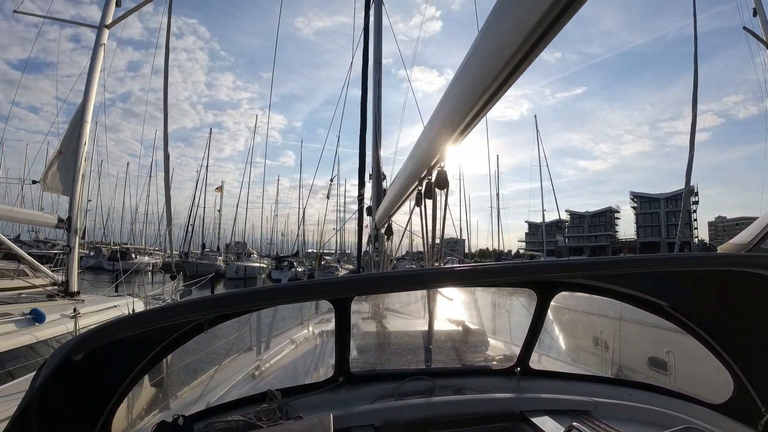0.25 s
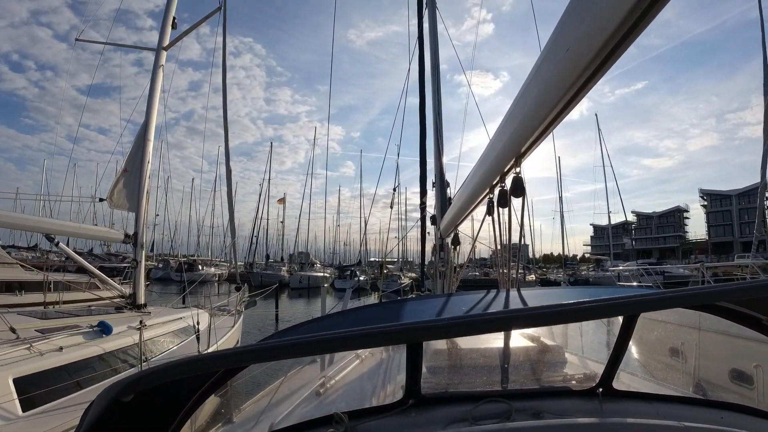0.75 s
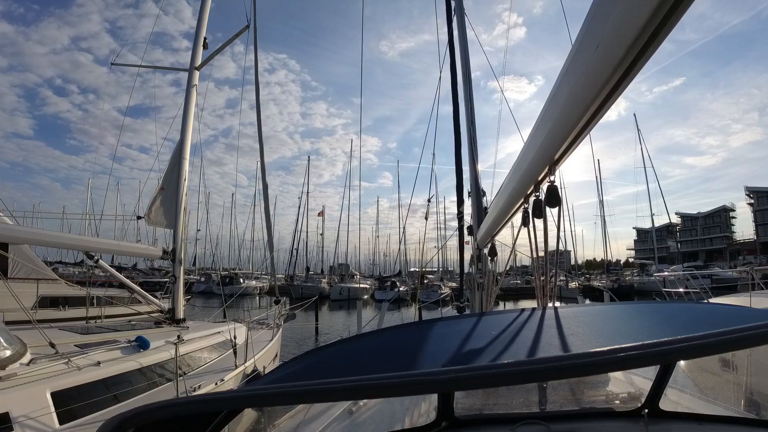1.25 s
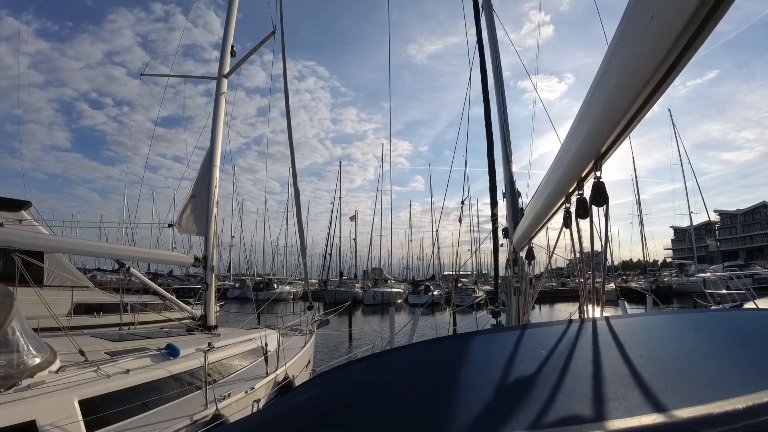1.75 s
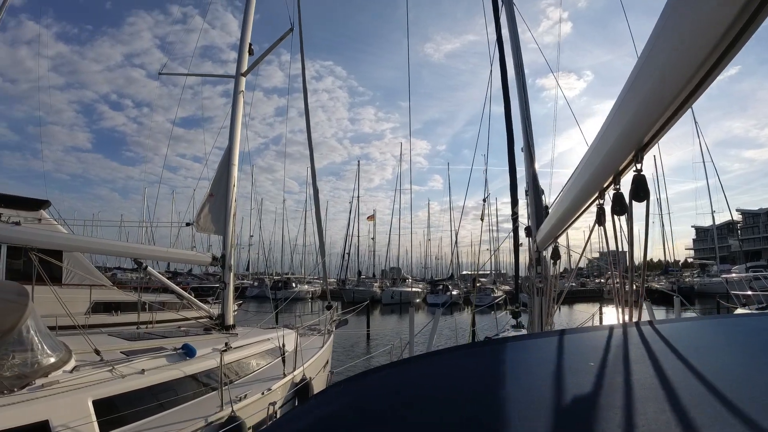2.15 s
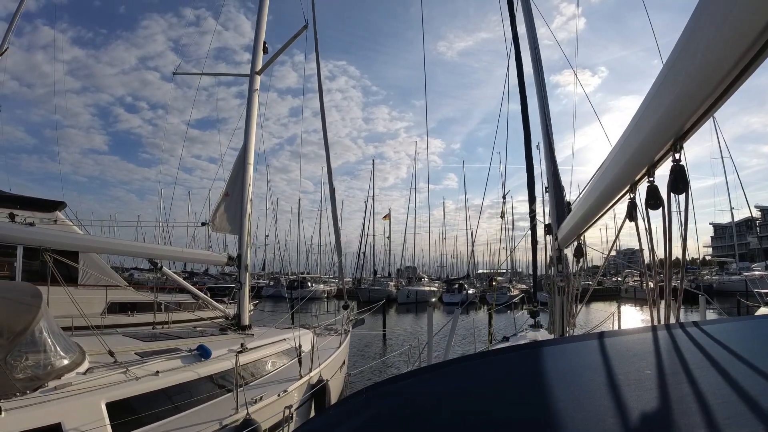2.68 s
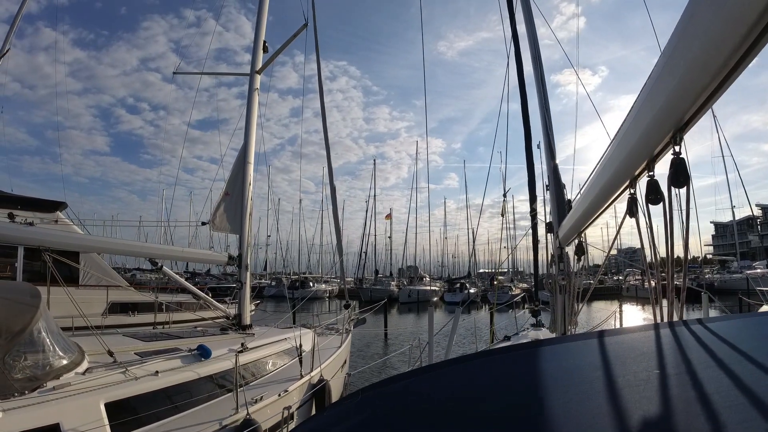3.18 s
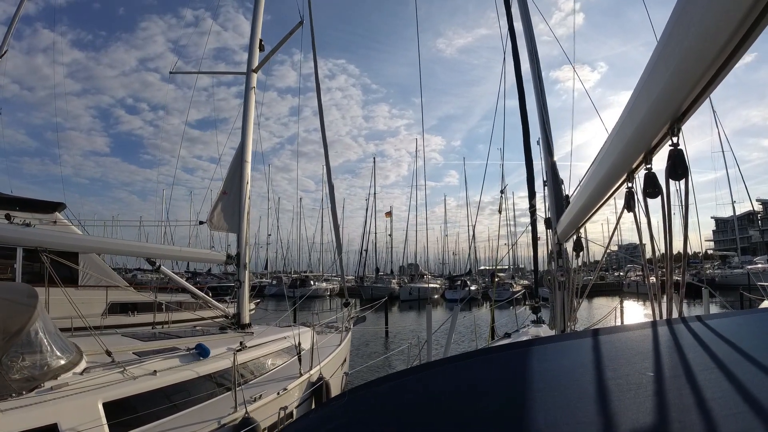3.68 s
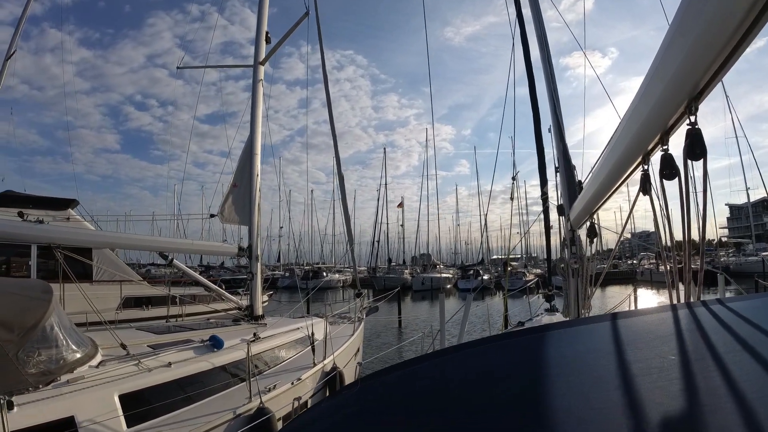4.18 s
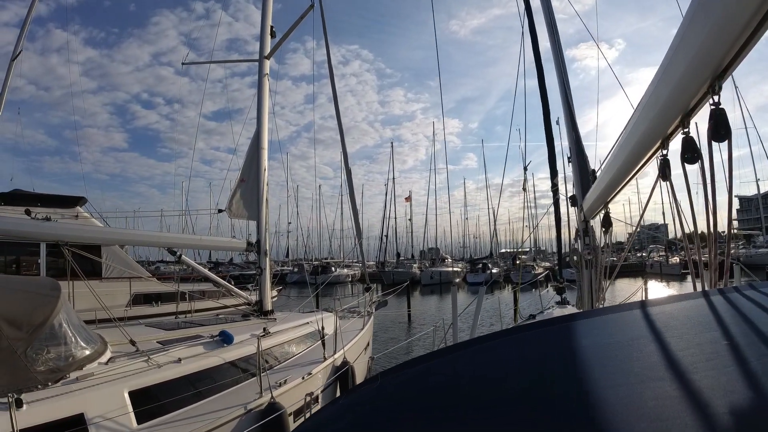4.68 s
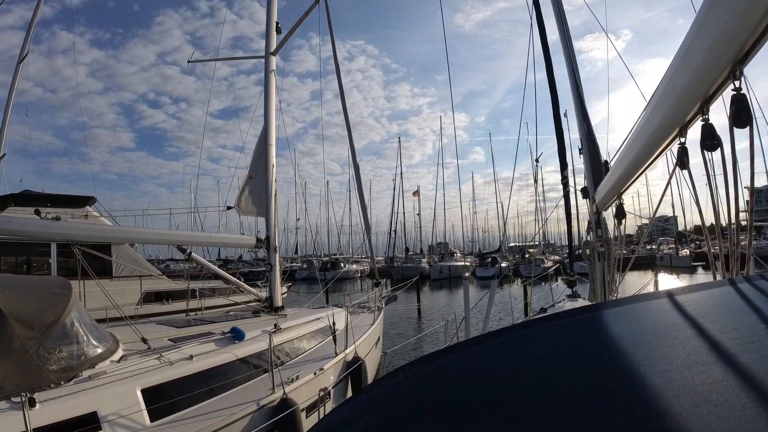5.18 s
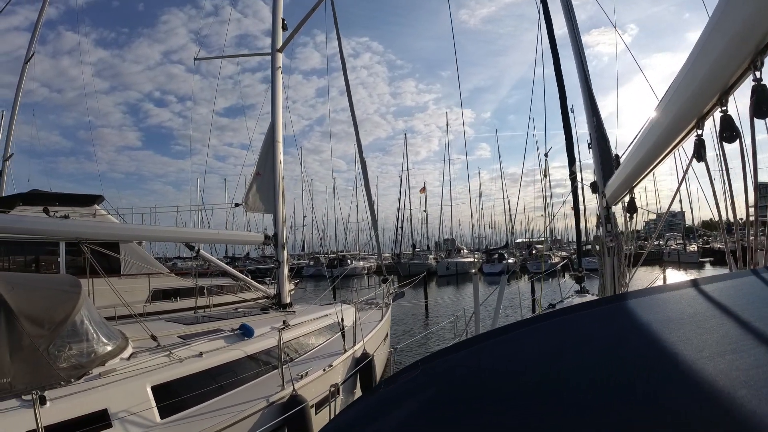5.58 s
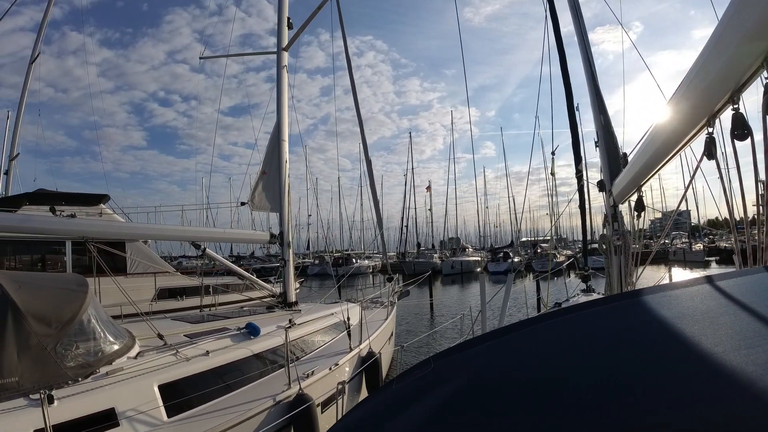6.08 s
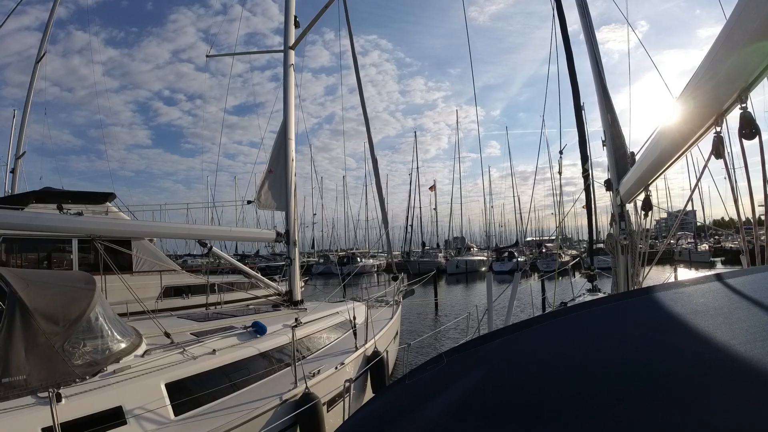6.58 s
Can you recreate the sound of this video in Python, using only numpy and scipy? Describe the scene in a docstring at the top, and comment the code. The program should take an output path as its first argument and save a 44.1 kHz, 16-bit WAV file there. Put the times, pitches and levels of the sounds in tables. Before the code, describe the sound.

Outdoors on a moored yacht, a gull gives a few yelps and two short mews, then a long, evenly repeated laughing call, lightly echoed by hulls and buildings. Wind hits the unprotected stereo microphone, first as separate low thumps on the left, then as a loud ragged rumble with bursts of hiss that spreads toward the centre. Faint bird chirps, dry creaks and a soft harbour murmur lie behind.

```python
"""Gulls over a windy marina

Heard from a yacht's cockpit: gulls give three yelps and two mews, then a long run of laughing notes.
Their calls are harmonic tones through throat resonances, echoed by hulls and quay buildings.
A breeze gets up and buffets two microphone ports: single thumps (pressure pulses), then a ragged
rumble (noise swept past at a changing speed) with bursts of hiss (shaped noise).
A small bird twitters (buzzy tones), deck gear creaks (gritty noise) and the harbour murmurs behind."""
import sys
import numpy as np
from scipy import signal
from scipy.fft import rfft, irfft
from scipy.io import wavfile
from scipy.ndimage import uniform_filter1d, map_coordinates

SR = 44100
rng = np.random.default_rng(int(sys.argv[2]) if len(sys.argv) > 2 else 0)


def generate_wav(signal):
    """Clip the signal to [-1, 1] and save it as 16-bit WAV at the path in sys.argv[1]."""
    frames = np.transpose(np.atleast_2d(signal))
    scaled = np.clip(frames, -1, 1) * 32767
    pcm = np.round(scaled).astype(np.int16)
    wavfile.write(sys.argv[1], SR, pcm)


N = 301644
T = np.arange(N) / SR  # time [s]


def undb(db):
    """Level and amplitude: decibels become gain, 20 dB to a factor of ten."""
    return 10 ** (np.asarray(db) / 20)


def gain_at(hz, points):
    """Spectral envelope: gain read between (Hz, dB) points on a logarithmic frequency axis."""
    point_hz, db = np.transpose(points)
    return undb(np.interp(np.log(np.maximum(hz, 1)), np.log(point_hz), db))


def colour(x, points):
    """Linear filtering: each frequency of x is scaled by a (Hz, dB) envelope."""
    return irfft(rfft(x) * gain_at(np.fft.rfftfreq(N, 1 / SR), points), N)


def noise(points):
    """Coloured noise: white noise filtered to the given spectrum, rms 1."""
    x = colour(rng.standard_normal(N), points)
    return x / x.std()


def walk(rate):
    """Slow random modulation: a smooth curve of spread 1 that changes about rate times a second."""
    hold = max(int(SR / rate), 2)
    steps = np.repeat(rng.standard_normal(N // hold + 1), hold)[:N]
    x = uniform_filter1d(steps, hold)
    return x / x.std()


def butter(x, hz, kind, order=2):
    """Butterworth response: a low-pass or high-pass with a flat pass band."""
    sos = signal.butter(order, min(hz, .45 * SR), kind, fs=SR, output="sos")
    return signal.sosfilt(sos, x + 1e-18)


def ports(pan_db):
    """Constant-power panning: left and right gains, pan_db apart, whose powers add up to one."""
    gains = undb(np.array([pan_db, -pan_db]) / 2).reshape(2, -1)
    return gains / np.sqrt((gains ** 2).sum(axis=0))


def steady(x, span_s):
    """Power normalisation: the short-term power of x is held at one."""
    power = np.abs(uniform_filter1d(x ** 2, int(span_s * SR)))
    return x / np.sqrt(power + 1e-9)


# Murmur of town and water: (frequency [Hz], level [dB per Hz])
HARBOUR_SPECTRUM = [(25, -10.5), (100, -10), (200, -16.5), (400, -22.5), (700, -27.5), (1300, -18.5),
                    (2000, -47), (4000, -44), (7000, -48.5), (9000, -54), (15000, -70.5)]
HARBOUR_DB = -54.5


def harbour():
    """Diffuse ambience: independent coloured noise at each ear of the pair, swelling gently."""
    swell_db = 1.2 * walk(3)
    pair = np.array([noise(HARBOUR_SPECTRUM), noise(HARBOUR_SPECTRUM)])
    return pair * undb(HARBOUR_DB + swell_db)


GUST_EDGE_S = 0.005067  # time constant of a gust's or lull's edges


def window(s, length_s):
    """Smooth gating: near one during a gust or lull, with quick hyperbolic-tangent edges."""
    return (1 + np.tanh((length_s / 2 - abs(T - s)) / GUST_EDGE_S)) / 2


# The breeze gets up from the left, swings round to the front and eases:
# (time [s], level [dB], left minus right [dB], eddy rate [Hz])
BREEZE = [(0, -31, 24.5, 89.07), (0.551, -40, 16, 87.56), (0.66, -31, 27.5, 83.23), (0.998, -28, 5, 92.36),
          (1.201, -20.5, 11, 105.2), (1.7, -16, 13, 165.7), (2.05, -20.5, 6, 110), (2.2, -18, 10, 185.1),
          (2.701, -15.5, 10, 164.9), (3.049, -12, 10, 190), (3.601, -13, 9, 180.2),
          (3.771, -20.5, 3, 129.7), (4.4, -17.5, 8, 126), (5.4, -12.5, -0.5, 122.8), (6.3, -20, 2, 125.3),
          (6.84, -23.5, 0, 134.7)]
# Gusts on top of the breeze: (middle [s], length [s], level [dB], left minus right [dB])
GUSTS = [(1.595, 0.15, -9.5, 6), (2.25, .17, -17, 21.5), (2.92, 0.12, -12, 5.5), (3.875, 0.071, -10, -3),
         (4.115, 0.081, -11, 15), (4.767, .14, -8, 0), (4.912, 0.062, -13.5, 0), (5.086, 0.084, -13.5, 0),
         (5.247, 0.14, -11, 0), (6.021, .11, -8.5, -2), (6.202, .11, -11, -1), (6.379, 0.044, -14, 3.5),
         (6.768, 0.08, -14.5, -7.5)]
GUST_QUICKENING = .18  # rise in eddy rate, as a share, when all the power is gust
# Brief lulls in the wind: (middle [s], length [s])
LULLS = [(1.165, 0.043), (2.041, .06), (2.691, 0.048), (5.01, .04), (5.691, 0.029), (6.67, 0.083)]
LULL_DB = -10


def airflow(unsteady_db=1.77):
    """Addition of powers: gusts join the breeze and speed its eddies; gives port levels and eddy rate."""
    at, *columns = np.transpose(BREEZE)
    db, pan_db, breeze_hz = (np.interp(T, at, column) for column in columns)
    breeze = (undb(db + unsteady_db * walk(9)) * ports(pan_db)) ** 2
    gusts = 0
    for s, length_s, db, pan_db in GUSTS:
        gusts = gusts + window(s, length_s) * (undb(db) * ports(pan_db)) ** 2
    power = breeze + gusts
    gust_share = gusts.sum(axis=0) / power.sum(axis=0)
    lull_db = LULL_DB * sum(window(*lull) for lull in LULLS)
    left_db, right_db = 10 * np.log10(power) + lull_db
    return left_db, right_db, breeze_hz * (1 + GUST_QUICKENING * gust_share)


EDDY_HZ = 140  # reference eddy rate
# Pressure spectrum of the turbulence at the reference rate: (frequency [Hz], level [dB per Hz])
EDDIES = [(30, -1), (90, 3.5), (170, -4), (270, -6), (400, -19.5), (600, -32.5), (900, -39), (1500, -65),
          (3000, -85)]
# Fine eddies that a fast flow sheds at the port: (frequency [Hz], level [dB per Hz])
ROAR = [(100, -12.5), (280, 6), (450, 0.5), (900, -17), (1300, -22), (2000, -39.5), (3000, -53),
        (5000, -74)]


def wind(gust_db=-0.04, bass_cut_hz=48, port_hz=1400, heave_db=-2.0, heave_hz=85,
         roar_db=-19.0, roar_growth=2.67, smoothing=0.98, quicken_db=1.5, ragged_db=1.8):
    """Frozen turbulence: eddies sweep past each port, so a spurt is both louder and higher in pitch."""
    left_db, right_db, eddy_hz = airflow()
    flow = eddy_hz / EDDY_HZ
    out = []
    for db in (left_db, right_db):
        # both a faint draught and a fast flow run more evenly
        spurts = walk(110) * np.clip((db + 42) / 15, .2, 1.2) / np.maximum(flow, 1) ** smoothing
        # the lee side sees slower air
        shelter_db = .5 * np.maximum(db - np.maximum(left_db, right_db), -10)
        speed = flow * undb(quicken_db * spurts + shelter_db)

        eddies = map_coordinates(noise(EDDIES), [np.cumsum(speed) % (N - 1)], order=1)
        eddies = butter(eddies * undb(ragged_db * spurts), bass_cut_hz, "high", order=3)
        eddies = butter(eddies, port_hz, "low", order=3)
        # the largest eddies, strongest in slow air
        heave = butter(noise(EDDIES), heave_hz, "low", order=3)
        heave = butter(heave, bass_cut_hz, "high", order=3)
        roar = noise(ROAR) * speed ** roar_growth

        pressure = undb(gust_db) * steady(eddies, 0.056)
        pressure = pressure + undb(heave_db) * steady(heave, 0.024) / flow
        pressure = pressure + undb(roar_db) * roar
        out.append(pressure * undb(db))
    return np.array(out)


# Small slaps inside the wind: mean level over the flow, its scatter, typical rise time constant
SLAP_COUNT, SLAP_DB, SLAP_SCATTER_DB, SLAP_RISE_S = 140, 0.5, 2, 0.00043


def small_slaps():
    """Intermittency: slaps at random times, stronger in fast air and on the windward port; thump rows."""
    left_db, right_db, eddy_hz = airflow()
    i = rng.integers(0, N, SLAP_COUNT)
    size, side, rise = rng.standard_normal((SLAP_COUNT, 3)).T
    db = np.maximum(left_db, right_db)[i] + SLAP_DB + SLAP_SCATTER_DB * size
    pan_db = 2 * (left_db - right_db)[i] + 10 * side
    rise_s = SLAP_RISE_S * EDDY_HZ / eddy_hz[i] * undb(2 * rise)
    return list(zip(T[i], db, pan_db, rise_s))


# Single slaps of air: (time [s], level [dB], left minus right [dB], rise time constant [s])
THUMPS = [(0.004, 4.5, 34, 0.0011), (0.086, 4.5, 40, 0.0011), (0.338, 7, 50, 0.0021),
          (0.863, 4, 18, 0.0018), (1.19, 5.5, 38, 0.0011), (1.403, -10.5, 14, 0.00034),
          (1.524, -3, 20, 0.00077), (1.665, -2.5, 22, 0.00045), (2.197, 3, 15, 0.00097),
          (2.466, -2, 16, 0.00049), (2.741, -2.5, 16.5, 0.00039), (2.876, -1, 28, 0.00041),
          (3.837, -2.5, -20, 0.00031), (4.357, 1.5, 25, 0.00076), (4.633, 1, -23, 0.0003),
          (4.686, -0.5, -15, 0.00039), (4.802, 0, -5, 0.00037), (6.155, -6, -4, 0.00082),
          (5.715, -3, -5, 0.00046), (5.202, -2, -13, 0.00033), (5.388, -2.5, 9, 0.00034),
          (5.523, -4, -10, .00038), (6.353, -0.5, 15, 0.00037), (6.448, 5.5, 29, .0013),
          (6.823, 0, -23, 0.00038)]


def thumps(slaps, bass_cut_hz=66, slap_db=16, scuff_db=-11, scuff_s=0.0076, scuff_hz=1100):
    """Impulse response: a push of pressure swings back in a falling wobble through the bass cut."""
    push, scuff = np.zeros((2, 2, N))
    for s, db, pan_db, rise_s in slaps:
        i = np.arange(int(s * SR) + 1, min(int((s + .1) * SR), N))
        age = T[i] - s
        size = undb(db) * ports(pan_db)
        push[:, i] += size * (age / rise_s / 2) ** 2 * np.exp(-age / rise_s)
        # sudden slaps break into small eddies
        scuff[:, i] += size * np.exp(-age / scuff_s) * (0.00019 / rise_s) ** 2
    scuff = scuff * rng.standard_normal((2, N)) * np.sqrt(SR / 2 / scuff_hz)
    pressure = undb(slap_db) * push + undb(scuff_db) * scuff
    pressure = butter(pressure, scuff_hz, "low", order=4)
    return butter(pressure, bass_cut_hz, "high", order=4)


def port_ring(pressure, ring_db=-1, ring_hz=745):
    """Cavity resonance: the small space behind each microphone port rings under the wind."""
    b, a = signal.iirpeak(ring_hz, 5, fs=SR)
    return pressure + undb(ring_db) * signal.lfilter(b, a, pressure)


# Air rushing mainly across the left port: (peak time [s], rise [s], fall [s], level [dB])
RUSHES = [(1.667, 0.014, 0.0085, -34), (1.714, 0.059, 0.085, -47.5), (2.111, 0.014, 0.015, -20.5),
          (2.844, 0.017, 0.019, -20.5), (2.984, 0.02, 0.048, -32), (3.038, 0.02, 0.094, -42.5),
          (5.113, 0.045, 0.025, -29.5), (5.31, 0.04, 0.076, -39), (5.79, 0.032, 0.067, -32),
          (5.965, 0.018, 0.011, -29), (6.331, 0.015, 0.011, -37), (6.449, 0.0016, 0.011, -34.5)]
# Hiss of the rushing air: (frequency [Hz], level [dB per Hz])
RUSH_SPECTRUM = [(400, 10.5), (1000, 6), (2000, 0), (3000, -2.5), (4200, -2), (5500, -7.5), (7000, -17),
                 (8200, -25.5), (9500, -53)]


def rushes(flutter_db=3, pan_db=20, shrill_db=16, shrill_hz=3300):
    """Edge noise: flow skimming the port's edge hisses, and the strongest bursts turn shrill."""
    size = 0
    for s, rise_s, fall_s, db in RUSHES:
        slope_s = np.where(T < s, rise_s, fall_s)
        size = size + undb(db) * np.exp(-np.minimum(((T - s) / slope_s) ** 2, 100))
    hiss = np.array([noise(RUSH_SPECTRUM), noise(RUSH_SPECTRUM)])
    shrill = undb(shrill_db) * size * butter(noise(RUSH_SPECTRUM), shrill_hz, "high", order=4)
    return (hiss + shrill) * size * undb(flutter_db * walk(250)) * ports(pan_db)


# Dry creaks and knocks of deck gear: (middle [s], level [dB], time to fall to 1/e on either side [s])
CREAKS = [(2.497, -42.5, 0.0074), (3.071, -34, 0.021), (3.12, -36, 0.0059), (3.176, -35, 0.0078),
          (3.22, -37, 0.0044), (3.387, -42.5, 0.014), (4.358, -44.5, 0.0067), (5.717, -38.5, .003),
          (6.02, -36, .011)]


def creaks(low_hz=1300, top_hz=3000, pan_db=32):
    """Stick-slip friction: short bursts of gritty, spiky noise, mostly from the left."""
    size = 0
    for s, db, length_s in CREAKS:
        size = size + undb(db) * np.exp(-np.minimum(((T - s) / length_s) ** 2, 100))
    grit = butter(rng.laplace(size=N), low_hz, "high")
    grit = butter(grit, top_hz, "low", order=8)
    return grit / grit.std() * size * ports(pan_db)


# Chirps of a small bird: (middle [s], pitch [Hz], half length [s], peak level [dB])
CHIRPS = [(2.388, 6170, 0.043, -51.5), (2.518, 6150, 0.078, -58), (2.75, 6400, 0.019, -53),
          (6.077, 5430, 0.034, -51)]


def small_bird(warble=0.072):
    """Frequency modulation: a fast random warble makes thin, buzzy chirps."""
    out, buzz = np.zeros(N), walk(910)
    for s, pitch_hz, half_s, db in CHIRPS:
        i = np.flatnonzero(abs(T - s) < half_s)
        phase = 2 * np.pi * np.cumsum(pitch_hz * (1 + warble * buzz[i])) / SR
        swell = np.cos(np.pi / 2 * (T[i] - s) / half_s) ** 2
        out[i] += undb(db) * swell * np.sin(phase)
    return out


def marina(x, near_db=-10, near_hz=2900, far_hz=2400, echo_s=0.3, echo_db=-29,
           near_t60=.28, far_db=-15.5, far_t60=1.0):
    """Reverberation: direct sound, scatter from nearby hulls, a slap from the quay, a long dull tail."""
    t, out = T[:SR], []
    for side in range(2):
        near, far = rng.standard_normal((2, SR))
        # cubing leaves sparse, spiky reflections
        near = butter(near ** 3, near_hz, "low") * undb(-60 * t / near_t60)
        far = butter(far, far_hz, "low") * undb(-60 * t / far_t60)
        response = undb(near_db) * near / np.linalg.norm(near)
        response = response + undb(far_db) * far / np.linalg.norm(far)
        response[0] += 1
        response[int(echo_s * SR)] += undb(echo_db)
        out.append(signal.fftconvolve(x, response)[:N])
    return np.array(out)


# The held whistle: (start [s], end [s])
WHISTLE_SPAN_S = (1.205, 1.39)


def whistle(pitch_hz=2555, db=-60, waver=.004):
    """Pure tone: a thin held whistle, slightly wavering, that outlasts the second mew."""
    start_s, end_s = WHISTLE_SPAN_S
    swell = np.clip(np.minimum(T - start_s, end_s - T) / 0.03, 0, 1)
    phase = 2 * np.pi * np.cumsum(pitch_hz * (1 + waver * walk(40))) / SR
    return undb(db) * swell * np.sin(phase)


# Resonances of a gull's throat: (frequency [Hz], level [dB])
THROAT = [(550, -37), (740, -28.5), (900, 6), (1100, 2), (1400, -2), (1800, -10), (2200, -12.5), (2750, -5),
          (3100, -7), (3550, -20), (3800, -12), (4200, -15.5), (4500, -37.5), (5100, -11), (5550, -43),
          (7050, -41)]


def gull(calls, shape, jitter=0.003, rough_jitter=0.023, half_db=-7, waver=0.0076, patchy_db=2.5,
         strain_db=70, top_db=0, bright_db=-2, length_scatter=0, count=12):
    """Source and filter: harmonics through a throat; when rough, pitch shakes and the period doubles."""
    out, shake, drift = np.zeros(N), walk(700), walk(45)
    fades = walk(28)  # paths over the water strengthen and cancel each partial in turn
    shape_s, ratio, swell_db, roughness = np.transpose(shape)
    for s, pitch_hz, db, shrill_db, rasp in calls:
        stretch = 1 + length_scatter * rng.uniform(-1, 1)
        i = np.flatnonzero((T > s + shape_s[0] * stretch) & (T < s + shape_s[-1] * stretch))
        age = (T[i] - s) / stretch
        bend = np.interp(age, shape_s, ratio)
        swell = np.interp(age, shape_s, swell_db)
        rough = np.interp(age, shape_s, roughness * rasp)
        hz = pitch_hz * bend * (1 + waver * drift[i] + (jitter + rough_jitter * rough) * shake[i])
        phase = 2 * np.pi * np.cumsum(hz) / SR
        for k in np.arange(1, count + 1) / 2:  # half-integer partials come from period doubling
            fade = fades[(i + int(k * SR)) % N]
            # strain_db [dB/s] tilts the partials above the second in the course of the call
            tilt_db = strain_db * age * np.clip(k - 2, 0, 2) + bright_db * np.clip(k - 2, 0, 1)
            voice_db = shrill_db * (k > 1) + top_db * (k > 3) + tilt_db
            size = undb(db + swell + voice_db + patchy_db * fade)
            if k % 1:
                size = size * rough * undb(half_db)
            out[i] += np.sqrt(2) * size * gain_at(k * hz, THROAT) * np.sin(k * phase)
    return out


# Level mews: (middle [s], pitch [Hz], level [dB], shrillness [dB], rasp [factor])
MEWS = [(0.835, 1520, -48, -30, 1.1), (1.215, 1278, -48, -12.5, 1.1)]
# Shape of a mew: (time from the middle [s], pitch [ratio], level [dB], roughness [0-1])
MEW = [(-.075, 0.74, -28, 0.4), (-.04, 0.99, 6.5, 0), (0, 0.99, 2, 0.9), (0.039, 1.0, -2, .6),
       (0.073, 0.99, -20.5, 0.5)]


def mews():
    """Subharmonics: a hoarse mew with a shaken pitch, then a reedy one with strong half-partials."""
    hoarse = gull(MEWS[:1], MEW, rough_jitter=0.053, half_db=4, strain_db=26.0)
    reedy = gull(MEWS[1:], MEW, jitter=.002, rough_jitter=.004, waver=.006, half_db=12.0,
                 strain_db=10, top_db=5.0)
    return hoarse + reedy


# Yelps: (register break [s], upper pitch [Hz], level [dB], shrillness [dB], rasp [factor])
YELPS = [(0.117, 1359, -38, 0, .6), (0.487, 1372, -41, 7, 1.5)]
# Shape of a yelp: (time from the break [s], pitch [ratio], level [dB], roughness [0-1])
YELP = [(-.14, .8, -28, .8), (-.11, .84, -17, .9), (-.08, .99, -26, .4), (-.071, 1.008, -2, .02),
        (-.04, 1.01, 2, .02), (-.02, .965, 0, .02), (-.002, .885, -7, .1), (.003, .775, 6, .05),
        (.07, .65, -16, .1)]
# The third yelp, long and hoarse: (slide [s], pitch [Hz], level [dB], shrillness [dB], rasp [factor])
HOARSE_YELPS = [(0.97, 1380, -44, 1, 1)]
# A rasping climb that clears and slides down:
# (time from the slide [s], pitch [ratio], level [dB], roughness [0-1])
HOARSE_YELP = [(-.2, .8, -18, .7), (-.14, .88, -11, 1.), (-.08, 1.06, -9, 1.), (-.045, 1.06, -6, .15),
               (0, .98, 5, .03), (.04, .79, -3, .25), (.065, .7, -20, .6)]


def yelps():
    """Register break: two clear yelps drop abruptly in pitch; a third climbs hoarsely and slides down."""
    clear = gull(YELPS, YELP, waver=0.0042, patchy_db=2.0, strain_db=-7.5, top_db=-9.5)
    hoarse = gull(HOARSE_YELPS, HOARSE_YELP, jitter=.006, rough_jitter=.06, half_db=2,
                  patchy_db=4.0, strain_db=1.0, top_db=-19.5)
    return clear + hoarse


# Notes of the laugh: (peak [s], level [dB], shrillness [dB], rasp [factor])
LAUGH = [(2.245, -54, 5, .6), (2.468, -44, 2, .6), (2.70, -51.5, -2.5, 0.42), (3.18, -42, -7, 1.1),
         (3.406, -47.5, -3, 0.89), (3.635, -46.5, -3.5, 1.2), (3.855, -47, 0.5, .5),
         (4.094, -43.5, 3.5, 1.2), (4.329, -44.5, -5.5, 1.16), (4.56, -42, -2, 1.2),
         (4.797, -47.5, 5.5, 0.89), (5.04, -39.5, 1, 0.6), (5.278, -41, 5.5, 2.4), (5.52, -41.5, 1, 1.75),
         (5.785, -42, -2, 1.3), (6.0, -43, 1, 0.98), (6.235, -44, 0.5, 1.53), (6.48, -44.5, 1.5, 0.47),
         (6.732, -42.5, 3, 0.19)]


def laugh(pitch_hz=1166, scatter=.014):
    """Pitch scatter: the notes of the laugh stray a little around one pitch."""
    return [(s, pitch_hz * (1 + scatter * rng.standard_normal()), *voice) for s, *voice in LAUGH]


# Shape of a laughing note: (time from the peak [s], pitch [ratio], level [dB], roughness [0-1])
NOTE = [(-.08, .9, -26, .9), (-.062, .915, -7, .9), (-.04, .925, -4, .25), (-.015, .97, -2, .06),
        (0, 1., 0, .05), (.018, .945, 0, .06), (.042, .89, 0, .1), (.068, .85, -17, .3)]
# Colour that the bill gives to the laugh: (frequency [Hz], level [dB])
BILL = [(1400, -1.5), (2150, 2), (2750, -8), (3150, -3), (3550, 0), (3800, -8), (4200, -0.5)]
# Short rising cries: (top [s], pitch [Hz], level [dB], shrillness [dB], rasp [factor])
CRIES = [(2.05, 1325, -51, -17, 1), (2.256, 1373, -44, -25.5, 0.94), (2.695, 1363, -41, -24.5, 1),
         (3.163, 1371, -42.5, -27, 0.9)]
# Shape of a cry: (time from the top [s], pitch [ratio], level [dB], roughness [0-1])
CRY = [(-.06, .8, -10, .3), (0, 1., 6, .1), (.02, .92, 3, .15), (.045, .85, -20, .2)]


def laughter():
    """Formant filtering: the bill colours the laughing notes; short cries join in."""
    notes = gull(laugh(), NOTE, length_scatter=0.17, rough_jitter=.032, half_db=-3, waver=.011,
                 patchy_db=4.0, strain_db=55.0, top_db=0.5)
    voices = colour(notes, BILL) + gull(CRIES, CRY, strain_db=4.5)
    return butter(voices, 4400, "low", order=16)


def scene():
    """Superposition: harbour, wind at the ports, deck gear and birds across the water add up."""
    buffeting = port_ring(wind() + thumps(THUMPS + small_slaps()))
    background = harbour() + buffeting + rushes() + creaks()
    twitter = marina(small_bird()) * ports(8.6)
    calls = marina(yelps() + mews() + whistle())
    calls = calls + marina(laughter(), near_db=-7.5, near_hz=5000)
    return background + twitter + undb(-3.5) * calls


TOP_HZ = 15900  # upper band edge


def record(dry, ceiling=.9):
    """Soft saturation and band limiting: the strongest buffets are rounded off and the top is cut."""
    rounded = dry / (1 + (dry / ceiling) ** 4) ** (1 / 4)
    top_cut = signal.ellip(8, .2, 70, TOP_HZ, fs=SR, output="sos")
    return signal.sosfilt(top_cut, rounded)


dry = scene()
out = record(dry)
generate_wav(out)
```